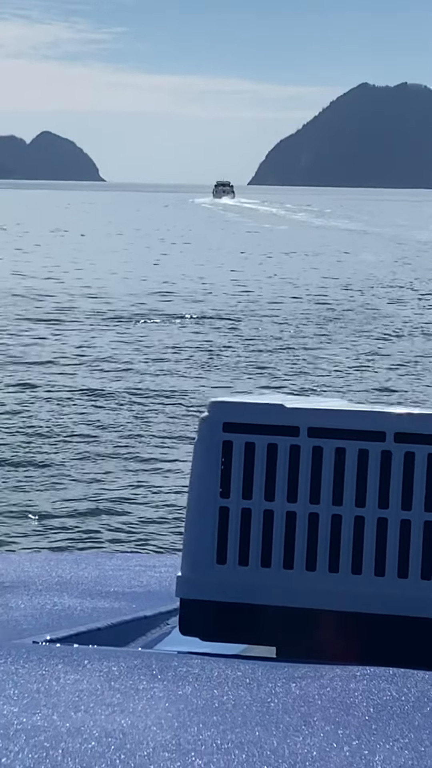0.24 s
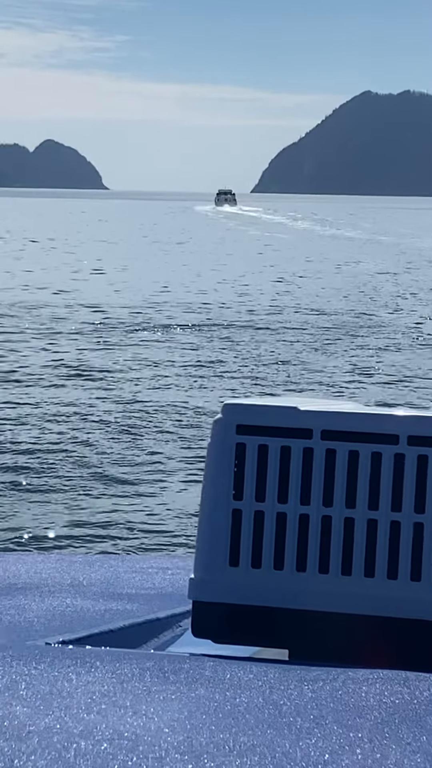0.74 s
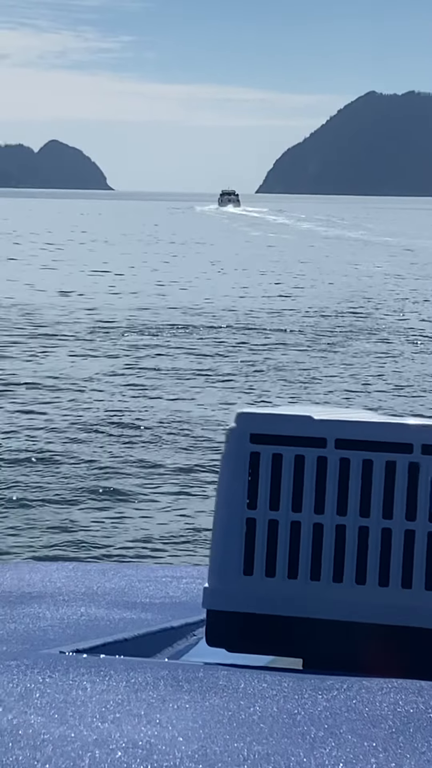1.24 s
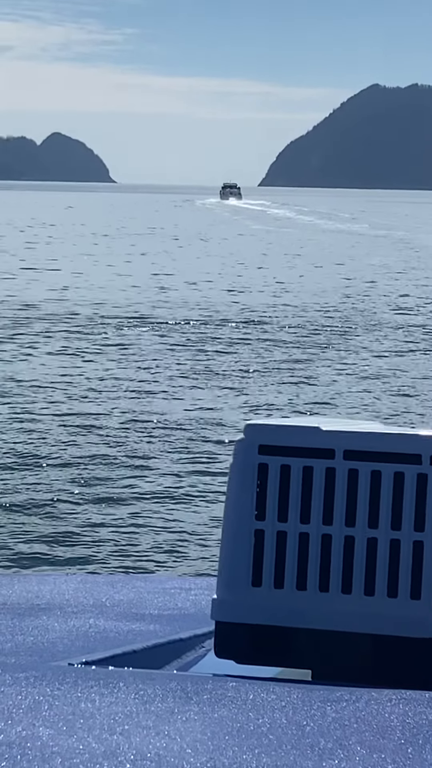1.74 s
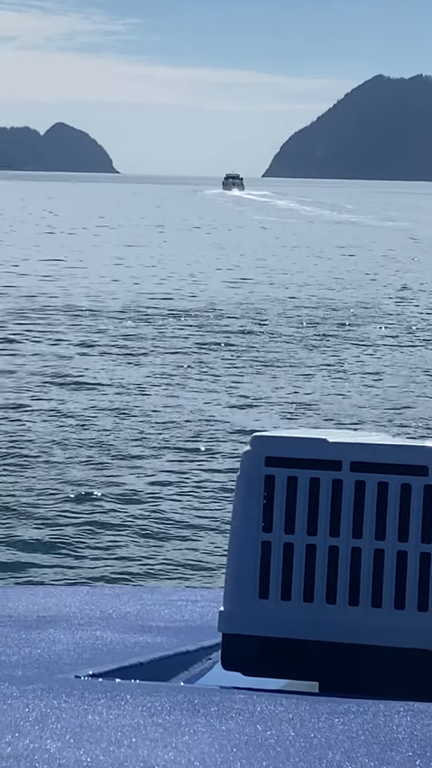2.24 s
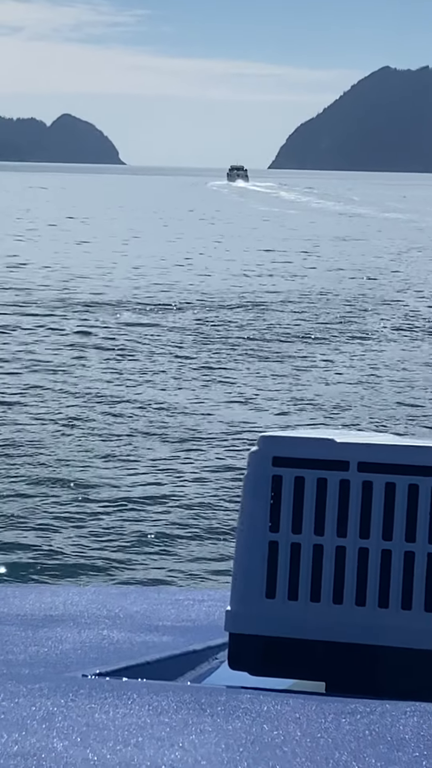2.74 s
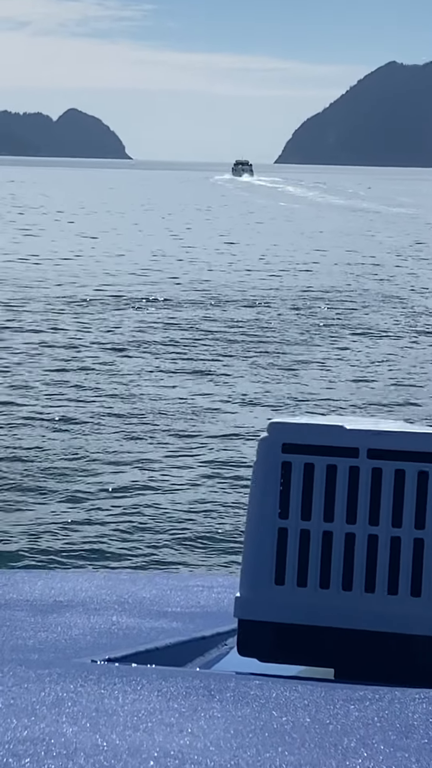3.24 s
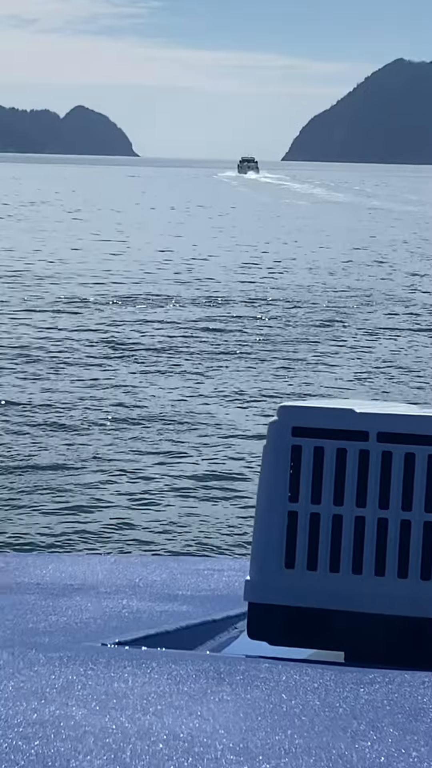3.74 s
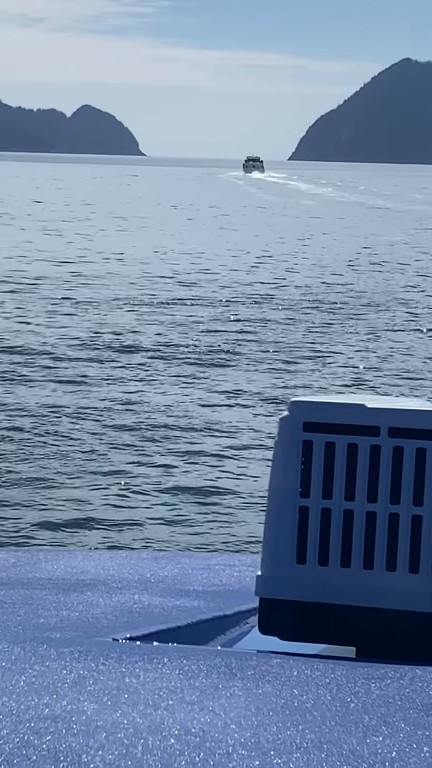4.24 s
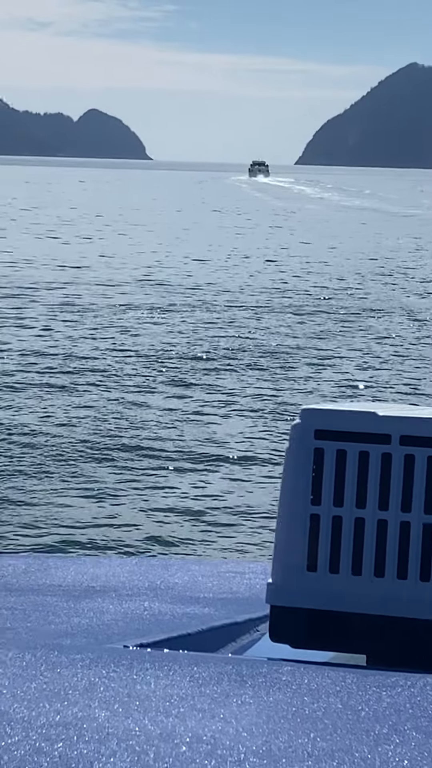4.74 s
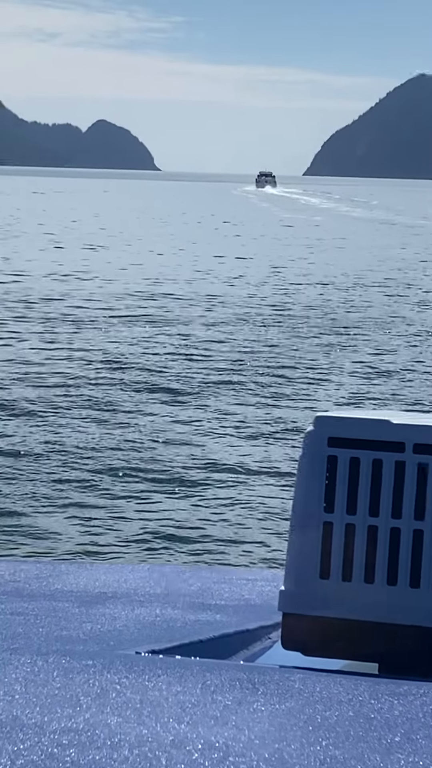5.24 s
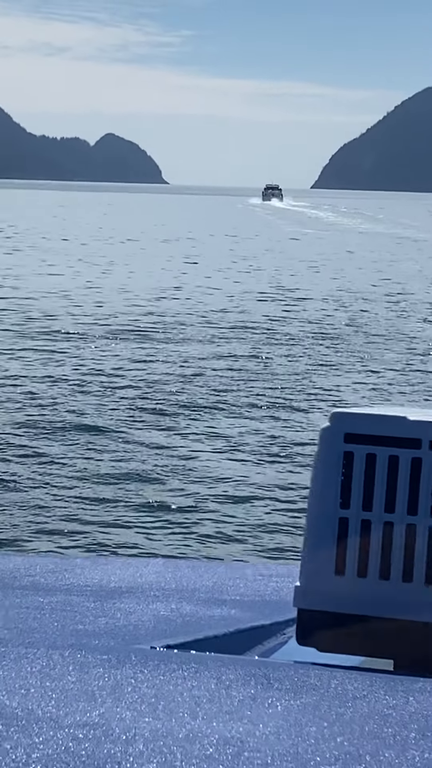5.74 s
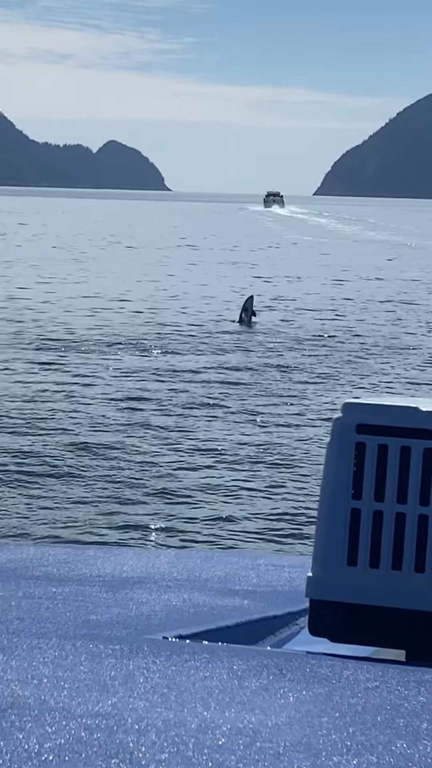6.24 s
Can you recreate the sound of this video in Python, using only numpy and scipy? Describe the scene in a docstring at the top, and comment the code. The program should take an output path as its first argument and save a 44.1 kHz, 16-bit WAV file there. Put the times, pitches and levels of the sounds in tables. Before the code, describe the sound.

A boat's diesel engine idles in a steady low throbbing rumble while water slaps, gurgles and softly hisses around the hull, with a few dull thumps.

```python
"""A boat diesel idles for 6.5 s on calm water, heard on deck with a handheld two-port microphone. From an 8 ms
fade-in to the end, sine exhaust orders and hums sound over noise shaped as exhaust rumble, casing clatter and
water hiss. Slaps, bursts of noise, crowd the first second; two hollow gurgles, band-passed noise, sound among
them at 0.49 and 0.67 s. From 0.85 s the hiss gushes; drops and ringing hull thumps begin near 1.8 s, thin sine
squeaks from 2 to 3 s, late drops and a last thump near the end. Phase and balance widen all but the bass."""
import sys
import numpy as np
from scipy import signal
from scipy.io import wavfile
from scipy.ndimage import uniform_filter1d

SR = 44100
rng = np.random.default_rng(int(sys.argv[2]) if len(sys.argv) > 2 else 0)


def file_out(sig):
    """Save sig as 16-bit WAV at sys.argv[1]."""
    # one column per channel
    cols = np.atleast_2d(sig).T
    # limit, then scale
    lim = np.clip(cols, -1, 1)
    pcm = np.round(lim * 32767).astype(np.int16)
    wavfile.write(sys.argv[1], SR, pcm)


N = 286517
T = np.arange(N) / SR


def gain_of(db):
    """Decibel law: amplitude gain of a level in dB."""
    return 10 ** (np.asarray(db) / 20)


def evened(x):
    """Normalisation: scales to rms 1."""
    return x / np.sqrt(np.mean(x ** 2) + 1e-20)


def read(points, hz, count=1):
    """Interpolation of one table column along log frequency."""
    rows = np.transpose(points)
    return np.interp(np.log(hz + 1), np.log(rows[0] + 1), rows[count])


def curve(rows, count, t=T):
    """Interpolation of one table column along time."""
    columns = np.transpose(rows)
    return np.interp(t, columns[0], columns[count])


def drift(rate_hz):
    """Superposition: twelve sines below rate_hz make a random wander of rms 1."""
    t = T[::256]
    slow = sum(np.sin(2 * np.pi * (f * t + rng.random())) for f in rate_hz * rng.random(12))
    return np.interp(T, t, evened(slow))


def resonances_db(modes, hz):
    """Resonance: each (centre, width, height) adds a bell-shaped peak to a spectrum in dB."""
    return sum(db / (1 + (2 * (hz - f) / width) ** 2) for f, width, db in modes)


def half_sine(start, length):
    """Windowing: a half-sine swell and fade."""
    return np.sin(np.pi * np.clip((T - start) / length, 0, 1))


def tone(hz, db):
    """Phase integration: a sine of the given rms level follows a pitch curve."""
    return np.sqrt(2) * gain_of(db) * np.sin(2 * np.pi * (np.cumsum(hz) / SR + rng.random()))


def frames(size):
    """Short-time grid: frequencies in a column, times in a row."""
    hz = np.fft.rfftfreq(size, 1 / SR)[:, None]
    t = np.arange(4 * len(T) // size + 5)[None] * size / 4 / SR
    return hz, t


# Likeness of the noise at the two ports: (frequency [Hz], likeness [0-1])
PORT_LIKENESS = [(800, 1.0), (1000, .88), (1250, .62), (1420, .95), (1950, .65), (2500, .88), (3200, .82),
                 (4300, .45), (5500, .7), (7500, .75), (7800, 1), (8900, 1), (9600, .75), (10900, .8),
                 (11150, 1), (12500, 1), (13200, .55), (13900, 1)]


def noise(field_db, patchy_db, size, count=9, unshared_patchy_db=0):
    """Partial coherence: noise of overall rms 1 follows a dB field, in random patches, at two ports."""
    hz = np.fft.rfftfreq(size, 1 / SR)
    a, b, c, d, *fields = rng.standard_normal((field_db.shape[1], len(hz), 6)).T
    smooth = []
    for field, bins in zip(fields, (count, 3)):
        across_hz = uniform_filter1d(field, size=bins, axis=0)
        smooth.append(evened(uniform_filter1d(across_hz, size=count, axis=1)))
    patches, unshared_patches = smooth
    same = np.clip(read(PORT_LIKENESS, hz), 0, 1)[:, None]
    shared = np.sqrt(1 + same) * (a + 1j * b)
    # capped random level patches in the unshared noise
    unshared_gain = evened(gain_of(unshared_patchy_db * np.minimum(unshared_patches, .4)))
    unshared = np.sqrt(1 - same) * (c + 1j * d) * unshared_gain
    z = np.array([shared + unshared, shared - unshared]) * gain_of(field_db + patchy_db * patches)
    ports = signal.istft(z, nperseg=size, noverlap=3 * size // 4)[1]
    return evened(ports[:, :len(T)])


CYCLE_HZ = 5.42  # mean rate of the four-stroke cycle, two shaft turns
FIRING_ORDER = 8  # multiple of the cycle
# Exhaust tones: (multiple of the cycle [1], mean level [dB])
EXHAUST_ORDERS = [(6, -45), (10, -44), (11, -41), (13, -41), (14, -43.5), (16, -42.5), (18, -43.5),
                  (19, -45.5), (21, -38.5), (24, -49), (26, -46), (27, -47), (29, -46), (32, -43.5),
                  (34, -49), (35, -50), (37, -52), (40, -51)]
# Swell of the firing tone: (time [s], level [dB])
FIRING_SWELL = [(0.0, -37), (0.22, -34), (0.45, -28.5), (0.67, -34.5), (0.92, -36), (1.05, -37),
                (1.75, -27.5), (2.35, -28), (2.95, -50), (3.02, -36.5), (3.89, -28), (5.68, -38),
                (5.92, -30), (6.5, -36)]
# Hums of gears, pumps and the generator: (mean frequency [Hz], mean level [dB], rms wander [Hz])
MACHINE_HUMS = [(29.4, -42, .1), (120, -45, .1), (240, -52, .2), (327.8, -40.5, .4), (309.8, -48, 1.4),
                (360, -48, .3), (398, -47, 5), (417, -51, 2), (944, -66, 3), (980, -64, 3), (1310, -68, 3),
                (1351, -64, 4)]


def engine():
    """Harmonic series: uneven cylinders sound multiples of the cycle, each swelling alone, beside machine hums."""
    cycle_hz = CYCLE_HZ * (1 + 0.0023 * drift(1.0))
    orders = sum(tone(k * cycle_hz, db + 2.95 * drift(1.55)) for k, db in EXHAUST_ORDERS)
    hums = sum(tone(hz + wander * drift(3.0), db + 0.79 * drift(4.0)) for hz, db, wander in MACHINE_HUMS)
    firing = tone(FIRING_ORDER * cycle_hz, curve(FIRING_SWELL, count=1))
    return orders + hums + firing


RUMBLE_DB = -27.5  # mean level
BOOM_EVEN_DB = -30  # at this table level the boom stands even with the rest of the rumble
# Exhaust noise spectrum: (frequency [Hz], relative density [dB per Hz])
EXHAUST_SPECTRUM = [(12, -42), (25, -17), (32, -9.5), (70, 1.5), (130, -4), (165, -5.5), (200, -11),
                    (280, -4.5), (345, -11.5), (420, -4), (470, -8.5), (600, -16), (680, -22), (900, -49.5),
                    (1500, -62.5), (3000, -120)]
# Boom, mostly below 100 Hz: (time [s], level against BOOM_EVEN_DB [dB])
BOOM_SWELL = [(0, -34), (.6, -26.5), (.85, -26.5), (1.05, -34), (1.5, -28), (1.72, -36), (1.9, -24.5),
              (2.15, -22), (2.6, -23.5), (2.85, -31), (3.3, -27.5), (3.7, -32), (4.35, -40), (4.7, -28),
              (5.0, -32), (5.3, -26), (5.5, -33), (5.7, -23.5), (5.95, -25.5), (6.25, -34), (6.5, -33)]
# Surges of the roar: (time [s], change under 250 Hz [dB], change from 250 Hz up [dB])
ROAR_SURGES = [(0, 3.5, 2), (.5, -2, 0.5), (1, 0, -1.5), (1.5, 2, 1.5), (2, -1, -0.5), (2.6, 1.5, 1.5),
               (3.2, 2.5, 0), (3.8, -1, -0.5), (4.3, 6.5, 0), (4.8, 1.5, 0), (5.4, 2, 0.5), (5.9, 0.5, 1.5),
               (6.3, 5.5, 0), (6.5, 6, 1)]


def rumble():
    """Turbulence: exhaust roars in the water and hull as broadband noise, surging unevenly."""
    hz, t = frames(size=4096)
    boom_db = (curve(BOOM_SWELL, count=1, t=t) - BOOM_EVEN_DB) / (1 + (hz / 95) ** 6)
    roar_db = np.where(hz < 250, curve(ROAR_SURGES, count=1, t=t), curve(ROAR_SURGES, count=2, t=t))
    field_db = read(EXHAUST_SPECTRUM, hz) + boom_db + roar_db
    return noise(field_db, patchy_db=2.0, size=4096) * gain_of(RUMBLE_DB + 0.5 * drift(13.0))


CASING_PATCHY_DB, UNSHARED_PATCHY_DB = 1.6, 15  # random level patches: in all the noise, in the unshared noise
# Casing noise spectrum: (frequency [Hz], relative density [dB per Hz])
CASING_SPECTRUM = [(400, -33.5), (650, -1), (900, -3), (1150, -3.5), (1450, -6), (1650, -9), (1850, -7.5),
                   (2000, -8.5), (2250, -13.5), (3000, -13.5), (4400, -23), (6500, -31), (9000, -49),
                   (14000, -77)]
# Casing resonances: (frequency [Hz], width [Hz], height [dB])
CASING_RESONANCES = [(710, 70, 4), (755, 25, -5), (800, 110, 7), (950, 40, 5), (1040, 50, 6), (1185, 35, 5),
                     (1350, 70, 4), (1550, 90, 7.5), (1705, 70, 4.5), (1914, 120, 3), (2050, 80, 3),
                     (2140, 60, 2.5), (2400, 130, 4), (2570, 140, 3.5), (4890, 500, 7.5)]
# Clatter: (time [s], level before the throb [dB])
CLATTER_LEVEL = [(0, -44.5), (.4, -44), (.8, -44.5), (1.5, -45.5), (2.2, -45.5), (3, -45), (3.8, -44.5),
                 (4.4, -45), (5.2, -45.5), (5.8, -45.5), (6.5, -44.5)]


def clatter():
    """Modal resonance: valves and pistons shake the casing, throbbing lightly at the shaft rate."""
    hz, t = frames(size=2048)
    field_db = read(CASING_SPECTRUM, hz) + resonances_db(CASING_RESONANCES, hz) + 0 * t
    throb_db = .7 * np.cos(4 * np.pi * CYCLE_HZ * T)  # two turns per cycle
    shaken = noise(field_db, CASING_PATCHY_DB, size=2048, count=5, unshared_patchy_db=UNSHARED_PATCHY_DB)
    return shaken * gain_of(curve(CLATTER_LEVEL, count=1) + throb_db)


BLOW_DB_PER_SQUARED_OCTAVE, BLOW_RISE_S = -17, 0.0048
# Blows to the hull: (time [s], level [dB], centre frequency [Hz])
HULL_THUMPS = [(1.849, -13, 134), (1.887, -7, 72), (3.055, -29, 200), (4.083, -9, 75), (4.0992, -8.5, 285),
               (4.111, -9, 166), (6.391, -13, 139)]
# Hull modes: (frequency [Hz], relative level [dB], 60 dB decay time [s])
HULL_MODES = [(70, -10, 0.086), (96, 0, 0.048), (133, 7.5, 0.024), (167, 4.5, 0.026), (211, -14.5, 0.038),
              (276, 5.5, 0.046), (343, -4, 0.033)]


def thumps():
    """Modal decay: short blows ring the hull modes, favouring those near the centre of each blow."""
    out = np.zeros(len(T))
    for s, db, centre_hz in HULL_THUMPS:
        u = np.maximum(T - s, 0)
        rise = 1 - np.exp(-u / BLOW_RISE_S)
        for hz, mode_db, t60 in HULL_MODES:
            level_db = db + mode_db + BLOW_DB_PER_SQUARED_OCTAVE * np.log2(hz / centre_hz) ** 2
            out += gain_of(level_db - 60 * u / t60) * np.sin(2 * np.pi * hz * u) * rise
    return out


# Bursts of water: (time [s], level before ring [dB], centre frequency [Hz], rise [s], 60 dB decay time [s])
WATER_SLAPS = [(.085, -46, 3020, .012, 0.22), (.115, -61, 3320, 0.0089, 0.25),
               (.26, -58.5, 4960, 0.0054, 0.18), (.355, -60, 5430, .006, 0.31), (.46, -57, 3480, .01, 0.28),
               (0.494, -40.5, 4100, 0.0024, 0.055), (0.508, -45.5, 4440, 0.0069, 0.14),
               (0.52, -39.5, 3640, 0.0089, 0.17), (.54, -50, 3600, 0.0086, 0.2),
               (.64, -50.5, 3500, 0.014, 0.28), (.672, -57, 2380, .006, 0.2), (.73, -57, 6030, .006, 0.17),
               (.925, -55, 3800, .015, 0.32), (.96, -55, 3000, 0.012, 0.3), (1.0, -58, 3440, .01, 0.28),
               (2.14, -55.5, 4200, 0.0076, 0.17)]
# Hollow that colours each slap: (frequency [Hz], width [Hz], height [dB])
SLAP_HOLLOW = [(1720, 820, 15.5), (3660, 1100, 9.5)]
# Single drops: (time [s], level [dB])
WATER_DROPS = [(1.745, -61), (1.84, -61), (5.253, -57), (5.327, -43), (5.448, -54)]
SLAP_OCTAVES = 1.03  # distance from the centre to the -6 dB point
DROP_HZ, DROP_OCTAVES, DROP_RISE_S, DROP_T60_S = 8900, 0.3, .001, .03
CRACKLE_DB = 1.8  # scale of the droplet irregularity


def slaps():
    """Impulsive radiation: wide slaps and narrow drops of noise swell and decay exponentially."""
    hz, t = frames(size=128)
    ring_db = resonances_db(SLAP_HOLLOW, hz)
    bursts = [(s, db + ring_db, centre_hz, SLAP_OCTAVES, rise, t60)
              for s, db, centre_hz, rise, t60 in WATER_SLAPS]
    bursts += [(s, db, DROP_HZ, DROP_OCTAVES, DROP_RISE_S, DROP_T60_S) for s, db in WATER_DROPS]
    power = 1e-16
    for s, db, centre_hz, octaves, rise, t60 in bursts:
        u = np.maximum(t - s, 0)
        band_db = -6 * (np.log2((hz + 50) / centre_hz) / octaves) ** 2
        swell = (1 - np.exp(-u / rise)) ** 2
        power = power + swell * gain_of(2 * (db + band_db - 60 * u / t60))
    # droplets break each burst up
    crackle = uniform_filter1d(rng.standard_normal(t.shape), size=4) * 2
    power = power * gain_of(2 * CRACKLE_DB * crackle)
    return noise(10 * np.log10(power), patchy_db=2.0, size=128) * np.sqrt(np.mean(power) * 3)


GURGLE_WIDTH_HZ, GURGLE_FAR_PORT_DB = 200, -17
# Hollow gurgles: (time [s], length [s], level before the swell [dB], pitch [Hz])
HOLLOW_GURGLES = [(0.49, 0.082, -46, 1710), (0.669, 0.032, -44, 1740)]


def gurgles():
    """Cavity resonance: noise through a narrow hollow swells and fades, nearer one port."""
    out = np.zeros(len(T))
    for s, length, db, pitch_hz in HOLLOW_GURGLES:
        edges_hz = [pitch_hz - GURGLE_WIDTH_HZ / 2, pitch_hz + GURGLE_WIDTH_HZ / 2]
        band = signal.butter(N=2, Wn=edges_hz, btype="band", fs=SR, output="sos")
        hollow = evened(signal.sosfilt(band, rng.standard_normal(len(T))))
        out += half_sine(s, length) * gain_of(db) * hollow
    return out * gain_of([[0], [GURGLE_FAR_PORT_DB]])


GUSH_FALL_DB_PER_S = 58
# Gushes over the steady hiss: (start [s], rise [s], hold [s], height [dB])
WATER_GUSHES = [(0.853, 0.11, 0.06, 4), (2.414, 0.026, 0.043, 6), (2.573, 0.036, 0.066, 3),
                (3.247, .2, 0.088, 3.5), (3.609, 0.02, 0.082, 6), (3.833, 0.029, 0.043, 7),
                (3.993, .07, 0.15, 4.5), (4.452, 0.11, 0.11, 2), (5.407, 1, .05, 6),
                (6.11, 0.042, 0.044, 7), (6.222, 0.15, .2, 7.5)]


def gush_db(t):
    """Envelope: each gush rises, holds and falls linearly in dB; the highest one counts."""
    heights = []
    for s, rise, hold, db in WATER_GUSHES:
        rising = db * (t - s) / rise
        falling = db - GUSH_FALL_DB_PER_S * (t - s - rise - hold)
        heights.append(np.clip(np.minimum(rising, falling), 0, db))
    return np.max(heights, axis=0)


WATER_DB = -67  # base level of the hiss off the hull
WATER_TILT, GUSH_TILT_PER_DB = -1.1, 0.9  # tilt [dB per octave] at rest; its gain per dB of gush
# Spray spectrum before the tilt: (frequency [Hz], relative density [dB per Hz])
SPRAY_SPECTRUM = [(1500, -16), (3000, 0), (5000, -5), (6500, -3.5), (7700, -2), (8100, 1), (9500, -3),
                  (11000, -2.5), (13000, -13.5), (15800, -14.5)]


def water():
    """Spectral tilt: spray hisses with a flickering level and brightens as it gushes."""
    hz, t = frames(size=256)
    tilt = WATER_TILT + GUSH_TILT_PER_DB * gush_db(t)
    field_db = read(SPRAY_SPECTRUM, hz) + tilt * np.log2(np.maximum(hz, 7000) / 9000)
    return noise(field_db, patchy_db=-2.5, size=256) * gain_of(WATER_DB + gush_db(T) + 1.0 * drift(40.0))


SQUEAK_HZ = 14300  # mean pitch
# Thin high squeaks: (time [s], length [s], mean level before the swell [dB])
HIGH_SQUEAKS = [(1.965, .04, -73), (2.435, .075, -68), (2.96, .04, -75)]


def squeaks():
    """Frequency modulation: soft-edged high sines tremble quickly in pitch and level."""
    out = np.zeros(len(T))
    for s, length, db in HIGH_SQUEAKS:
        out += half_sine(s, length) * tone(SQUEAK_HZ + 150 * drift(200.0), db + 3.0 * drift(100.0))
    return out


def scene():
    """Superposition: all sources add at the two microphone ports."""
    return engine() + rumble() + clatter() + thumps() + slaps() + gurgles() + water() + squeaks()


FADE_IN_S, EDGE_HZ = .008, 15750  # opening fade; upper band limit
TURN_S = 2.74  # time constant: the turn of the microphone slows as it settles
MONO_START_HZ = 225  # bass below this is summed to the centre at first; the edge then rises with the turn
# Phase turn of the widener: (frequency [Hz], lead of the right [rad])
PHASE_LEAD = [(680, 3.1), (950, 3.25), (1300, 2.9), (1800, 3.4), (2300, 3.2), (2600, 3.6), (3600, 3.6),
              (4300, 4.9), (4900, 3.6), (6200, 2.5), (7500, 1), (7750, 0), (8900, 0), (11100, -np.pi),
              (12450, -np.pi), (13900, -2 * np.pi)]
# Width as the microphone turns; the lead columns serve below the first row of PHASE_LEAD, the balance everywhere:
# (frequency [Hz], right lead at first [rad], finally [rad], left-right at first [dB], finally [dB])
TURNING_WIDTH = [(212, 0, 0.5, 0.5, 0.5), (273.6, 1.5, -3, 0, 0), (260, 4, 0, -10, 8.5),
                 (338, -0.5, 0.5, -9.5, -10.5), (372, -1, -1, -9, -9.5), (433, 2, 0.07, 1, 4.5),
                 (545, 2.5, 1.33, 1, -4.5), (604, 3, 2.0, -2.5, 3), (770, 4, 6, 0, 0.5)]


def record(dry):
    """Interaural difference: phase and balance part the ports; bass is centred and the band limited."""
    fade = np.sin(np.pi / 2 * np.minimum(T / FADE_IN_S, 1)) ** 2
    padded = np.pad(dry * fade, [(0, 0), (0, SR // 10)], "reflect")
    hz, t, z = signal.stft(padded, SR, nperseg=2048, boundary="even")
    hz, turn = hz[:, None], 1 - np.exp(-t / TURN_S)
    lead0, lead1, pan0, pan1 = (read(TURNING_WIDTH, hz, count=k) for k in range(1, 5))
    turning_lead = lead0 + (lead1 - lead0) * turn
    lead = np.where(hz < PHASE_LEAD[0][0], turning_lead, read(PHASE_LEAD, hz))
    left = gain_of((pan0 + (pan1 - pan0) * turn) / 2) * np.exp(-.5j * lead)
    z = z * np.array([left, 1 / left])
    mid, side = z.mean(0), (z[0] - z[1]) / 2
    mono_hz = MONO_START_HZ * (1 + 0.57 * turn)
    side = side / (1 + (mono_hz / (hz + 1)) ** 16)
    wide = signal.istft(np.array([mid + side, mid - side]), SR, nperseg=2048)[1]
    edge = signal.firwin(511, EDGE_HZ, window=("kaiser", 9), fs=SR)
    return signal.oaconvolve(wide, edge[None], "same")[:, :N]


dry = scene()
out = record(dry)
file_out(out)
```